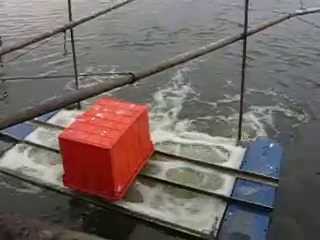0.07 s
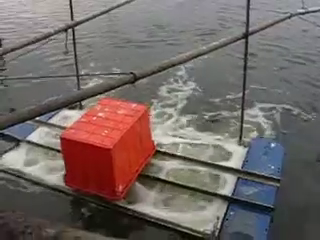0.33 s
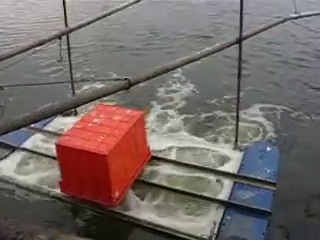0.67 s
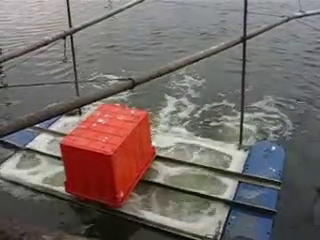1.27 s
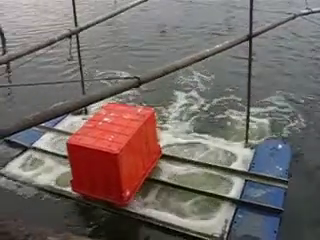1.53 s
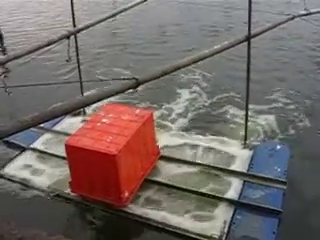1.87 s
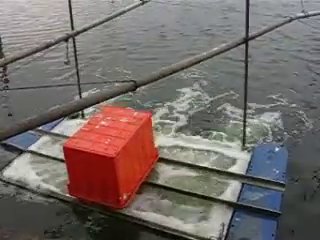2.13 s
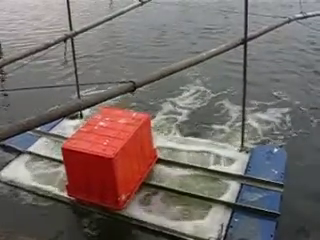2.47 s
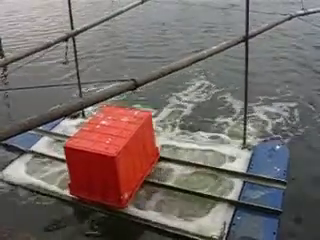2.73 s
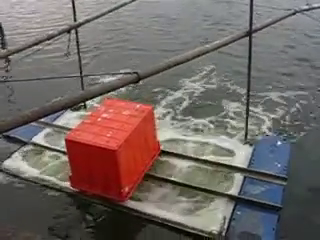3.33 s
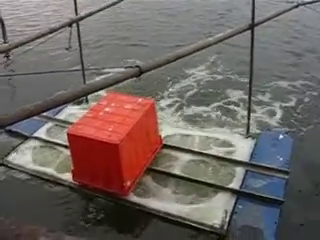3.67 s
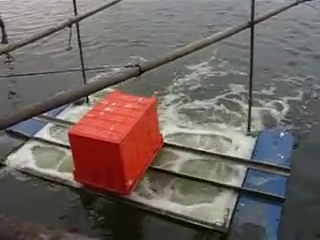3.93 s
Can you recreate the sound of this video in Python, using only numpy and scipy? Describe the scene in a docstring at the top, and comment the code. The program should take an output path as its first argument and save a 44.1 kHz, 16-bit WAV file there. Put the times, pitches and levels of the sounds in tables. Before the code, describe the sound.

A pond aerator runs for the whole four seconds with a steady, high motor whine, a faint drone and a thin whistle that swells and fades. Churned water rushes, gurgles and fizzes beneath it. Wind rumbles loudly on the microphone in uneven gusts, strongest around 3 seconds. A small water splat comes at about 1 second, and a few more between 3.1 and 3.5 seconds.

```python
"""Pond aerator in wind

A floating aerator churns the water: it rushes and splats, bubbles gurgle, foam fizzes.
Its motor whines at multiples of a steady shaft rate, whistles, and shakes the cover into a drone.
Wind buffets the microphone, and the recorder's limiter ducks everything under each gust."""
import sys
import numpy as np
from scipy import signal
from scipy.io import wavfile

SR = 44100
rng = np.random.default_rng(int(sys.argv[2]) if len(sys.argv) > 2 else 0)


def generate_wav(sig):
    """Save sig (samples, or channels by samples) to the path in sys.argv[1] as 16-bit PCM at SR."""
    pcm = np.round(np.clip(np.atleast_2d(sig).T, -1, 1) * 32767).astype(np.int16)
    wavfile.write(sys.argv[1], SR, pcm)


N = 176400


def from_db(db):
    """Decibels to gain."""
    return 10 ** (np.asarray(db) / 20)


def unit_rms(x):
    """Scale to unit power."""
    return x / np.sqrt(np.mean(x ** 2) + 1e-20)


def curve(points):
    """Join (time_s, value) points by straight lines."""
    return np.interp(np.arange(N) / SR, *np.transpose(points))


def drift(rate_hz):
    """Slow random motion of spread 1."""
    hop, settle = 40, 2000
    pole = np.exp(-2 * np.pi * rate_hz * hop / SR)
    noise = rng.standard_normal(N // hop + settle + 2)
    slow = signal.lfilter([1], [1, -2 * pole, pole ** 2], noise)[settle:]
    return np.interp(np.arange(N) / hop, np.arange(len(slow)), unit_rms(slow))


def resonance(x, hz, width_hz):
    """Two-pole resonance, unity peak gain."""
    radius = np.exp(-np.pi * width_hz / SR)
    feedback = [1, -2 * radius * np.cos(2 * np.pi * hz / SR), radius ** 2]
    return signal.lfilter(np.array([1, 0, -1]) * (1 - radius ** 2) / 2, feedback, x + 1e-18)


def double_resonance(x, hz, width_hz):
    """Two equal resonances in series."""
    return resonance(resonance(x, hz, width_hz), hz, width_hz)


def banded_noise(spectrum, flicker_db, flicker_hz, bands, swell_db=lambda hz: 0):
    """Noise bands, each with its own level, flicker and swell; rms 1 before the swell."""
    points_hz, points_db = np.transpose(spectrum)
    edges_hz = np.geomspace(points_hz[0], points_hz[-1], bands + 1)
    white = rng.standard_normal((2, N))
    steady = swelling = 0
    for k, (low, high) in enumerate(zip(edges_hz, edges_hz[1:])):
        centre_hz = np.sqrt(low * high)
        level_db = np.interp(np.log(centre_hz), np.log(points_hz), points_db)
        bandpass = signal.butter(2, [low, high], "band", fs=SR, output="sos")
        band = signal.sosfilt(bandpass, white[k % 2]) * from_db(level_db + flicker_db * drift(flicker_hz))
        steady += band
        swelling += band * from_db(swell_db(centre_hz))
    return swelling / np.std(steady)


# Wind strength: time_s, level_db
GUSTS = [(.08, -12), (.19, -15), (.33, -10), (.42, -9.5), (.56, -22), (.68, -13), (.74, -17), (.8, -12),
         (.93, -13), (1.04, -15), (1.12, -11), (1.19, -15), (1.26, -13.5), (1.48, -13), (1.64, -17.5),
         (1.8, -12), (1.87, -16.5), (1.98, -9.5), (2.06, -13), (2.22, -11), (2.4, -13.5), (2.48, -10),
         (2.56, -13.5), (2.74, -14), (2.83, -16.5), (2.9, -12.5), (3.14, -7.5), (3.2, -15.5), (3.28, -13.5),
         (3.44, -12), (3.62, -12.5), (3.98, -13.5)]
# Rumble spectrum: freq_hz, relative_density_db
RUMBLE_SPECTRUM = [(20, -4.5), (40, -1), (80, -0.23), (140, -0.5), (200, -5.5), (310, -11.5), (400, -19.5),
                   (500, -21.5), (700, -28), (1200, -35.5), (2000, -51.5), (4000, -78.5)]


def wind(gain_db=-2.5, eddy_db=1.45, eddy_hz=27.6, tilt_per_octave=0.52, pivot_hz=134):
    """Lumpy rumble on the microphone; stronger gusts reach higher in pitch."""
    level_db = curve(GUSTS)
    gust_db = level_db - level_db.mean() + eddy_db * drift(eddy_hz)

    def swell_db(hz):
        octaves = np.clip(np.log2(hz / pivot_hz), -2, 2)
        return gust_db * (1 + tilt_per_octave * octaves)

    rumble = banded_noise(RUMBLE_SPECTRUM, flicker_db=1, flicker_hz=14, bands=18, swell_db=swell_db)
    return from_db(gain_db + level_db.mean()) * rumble


# Wind buffets: peak_s, level_db
WIND_BUFFETS = [(.26, -26), (0.331, -24), (.68, -23.5), (0.889, -22.5), (1.37, -21), (1.491, -19.5),
                (1.719, -23.5), (1.93, -24.5), (2.02, -23), (2.261, -22), (2.669, -24), (2.98, -17),
                (3.11, -17), (3.23, -16), (3.48, -20), (3.59, -17)]


def buffets(half_width_s=0.035):
    """Brief swells of a higher, hollow rumble within the gusts."""
    t = np.arange(N) / SR
    swell = sum(from_db(db) * np.exp(-((t - peak_s) / half_width_s) ** 2) for peak_s, db in WIND_BUFFETS)
    return swell * unit_rms(double_resonance(rng.standard_normal(N), hz=248, width_hz=240))


def bubbles(per_s, low_hz, high_hz, cycles, spread_db, pitches):
    """Bubbles of random strength ring briefly at scattered pitches; rms 1."""
    strengths = from_db(spread_db * np.minimum(rng.exponential(1, N), 4)) * rng.choice([-1, 1], N)
    clicks = strengths * (rng.random(N) < per_s / SR)
    pitch_index = rng.integers(0, pitches, N)
    rings = 0
    for k, hz in enumerate(np.geomspace(low_hz, high_hz, pitches)):
        rings += unit_rms(resonance(clicks * (pitch_index == k), hz, 2 * hz / cycles))
    return unit_rms(rings)


# Churned water spectrum: freq_hz, relative_density_db
RUSH_SPECTRUM = [(150, 14), (600, 11), (1000, 11), (1500, 6), (1900, -2), (2600, 0.5), (3500, 1),
                 (4100, 1.5), (4450, -0.5), (4900, 3.5), (5500, -2), (6300, -13)]


def water(rush_db=-35, gurgle_db=-40.5, fizz_db=-44.5, surge_db=0.1):
    """Churned water rushes, bubbles gurgle and foam fizzes, with a faint common surge."""
    rush = banded_noise(RUSH_SPECTRUM, flicker_db=1.17, flicker_hz=14, bands=36)
    gurgle = bubbles(per_s=350, low_hz=429, high_hz=1400, cycles=29, spread_db=2.5, pitches=16)
    fizz = bubbles(per_s=1800, low_hz=2340, high_hz=5130, cycles=6, spread_db=5, pitches=14)
    churn = from_db(rush_db) * rush + from_db(gurgle_db) * gurgle + from_db(fizz_db) * fizz
    return churn * from_db(surge_db * drift(rate_hz=9))


# Water splats: start_s, peak_before_lowpass_db, centre_hz
WATER_SPLATS = [(1.076, -21, 1300), (3.133, -25, 1500), (3.146, -21.5, 1800), (3.243, -23, 1300),
                (3.277, -14, 780), (3.518, -10, 750)]


def splats(decay_s=0.0013, lowpass_hz=2300):
    """Each splat is a broad burst that dies in a few milliseconds."""
    out = np.zeros(N)
    t = np.arange(SR // 20) / SR
    for start_s, peak_db, centre_hz in WATER_SPLATS:
        noise = rng.standard_normal(len(t)) * np.exp(-t / decay_s)
        burst = double_resonance(noise, centre_hz, width_hz=centre_hz)
        start = int(start_s * SR)
        out[start:start + len(t)] += from_db(peak_db) * burst / np.abs(burst).max()
    return signal.sosfilt(signal.butter(4, lowpass_hz, fs=SR, output="sos"), out)


# Cover and frame resonances: centre_hz, width_hz, level_db
COVER_MODES = [(466.7, 45, -41.5), (638.5, 20, -40.5), (740, 20, -47), (830, 30, -45.5), (912, 57, -45.5),
               (960.6, 56, -42.5), (1085.4, 20, -46), (1151, 61, -51.5), (1373, 160, -48.5),
               (1563, 120, -54), (4020, 230, -53), (4173, 170, -51.5), (4670, 94, -52.5), (4864, 140, -49),
               (5120, 120, -51)]


def cover_drone():
    """The motor shakes the cover and frame, which ring at their resonances."""
    return sum(from_db(level_db) * unit_rms(double_resonance(rng.standard_normal(N), hz, width_hz))
               for hz, width_hz, level_db in COVER_MODES)


def tone(pitch_hz, level_db, flutter_db):
    """A fluttering sine that follows a pitch track."""
    amplitude = np.sqrt(2) * from_db(level_db + flutter_db * drift(rate_hz=11))
    return amplitude * np.sin(2 * np.pi * (np.cumsum(pitch_hz) / SR + rng.random()))


# Running gear tones: pitch_hz, level_db
GEAR_PARTIALS = [(1823, -58.5), (2417, -64.5), (2657, -56), (4797, -52)]
# Motor whistle envelope: time_s, level_db
WHISTLE_ENVELOPE = [(.08, -42), (.16, -42), (.26, -53.5), (.44, -44.5), (.76, -45), (.92, -52), (1.1, -39),
                    (1.22, -40), (1.36, -42), (1.56, -41), (1.74, -48.5), (2.06, -43), (2.55, -43.5),
                    (2.68, -42.5), (2.87, -39.5), (3.02, -46.5), (3.12, -39.5), (3.33, -40), (3.4, -47),
                    (3.58, -43), (3.98, -48)]


def gear_and_whistle(whistle_hz=3113.5, wander=0.00024):
    """Thin steady tones from the running gear; a high motor whistle swells and fades."""
    partials = GEAR_PARTIALS + [(whistle_hz, curve(WHISTLE_ENVELOPE))]
    return sum(tone(hz * (1 + wander * drift(rate_hz=4.5)), db, flutter_db=1) for hz, db in partials)


# Whine harmonics: shaft_multiple, level_db
WHINE_HARMONICS = [(11, -47.5), (23, -27.5), (24, -45), (25, -47.5), (26, -50)]
# Whine envelope: time_s, offset_db
WHINE_ENVELOPE = [(.08, -1), (.45, 0.5), (.7, 0.7), (1.04, 0), (1.2, -2.5), (1.6, 0), (2.1, 0.7),
                  (2.6, -.5), (2.85, -0.9), (3.1, -1), (3.6, -0.8), (3.98, 0.7)]


def motor_whine(shaft_hz=57.87, wander=0.00016):
    """Tones at multiples of the shaft rate swell and sink a little together."""
    speed_hz = shaft_hz * (1 + wander * drift(rate_hz=12))
    offset_db = curve(WHINE_ENVELOPE)
    return sum(tone(round(multiple) * speed_hz, level_db + offset_db, flutter_db=0.7)
               for multiple, level_db in WHINE_HARMONICS)


def scene():
    """Aerator, water and wind at one microphone."""
    motor = motor_whine() + gear_and_whistle() + cover_drone()
    return (motor + water() + splats() + wind() + buffets())[None]


def record(dry):
    """The recorder starts; a fast limiter ducks on each peak and recovers slowly; the top is cut."""
    start_s, lowpass_hz = 0.072, 6500
    threshold_db, ceiling = -9, 0.42
    attack_s, look_ahead_s, release_db_per_s = 0.00029, 0.00034, 55
    t = np.arange(N) / SR
    mic = dry[0] * (t >= start_s)
    over_db = np.maximum(20 * np.log10(np.abs(mic) + 1e-9) - threshold_db, 0)
    held_db = np.maximum.accumulate(over_db + release_db_per_s * t) - release_db_per_s * t
    pole = np.exp(-1 / (attack_s * SR))
    smoothed_db = signal.lfilter([1 - pole], [1, -pole], held_db)
    duck_db = np.interp(t + look_ahead_s, t, smoothed_db)
    limited = np.clip(mic * from_db(-duck_db), -ceiling, ceiling)
    return signal.sosfilt(signal.cheby2(12, 50, lowpass_hz, fs=SR, output="sos"), limited)[None]


dry = scene()
out = record(dry)
generate_wav(out)
```